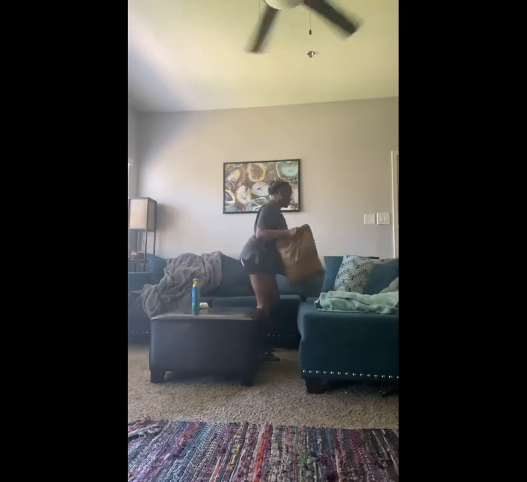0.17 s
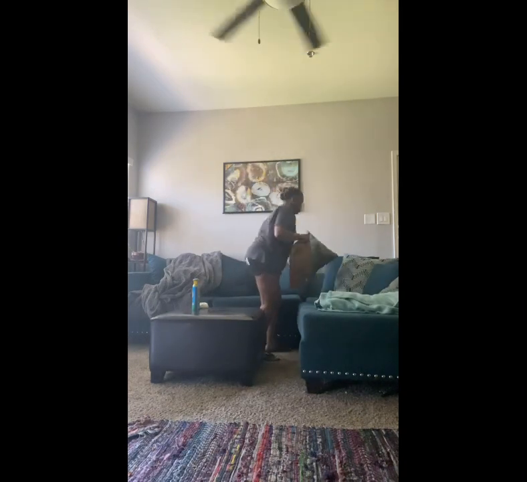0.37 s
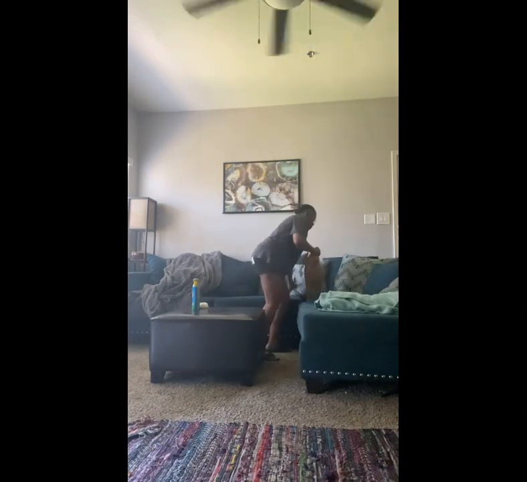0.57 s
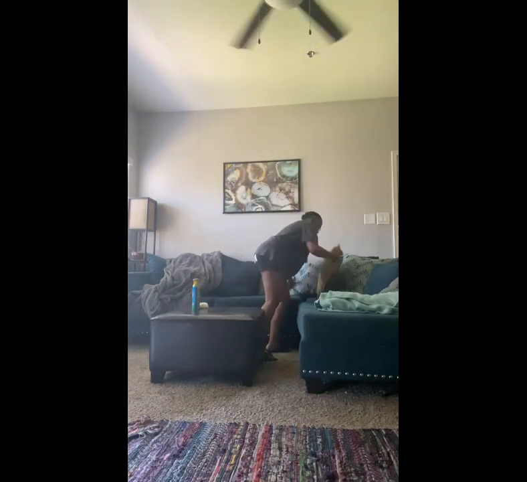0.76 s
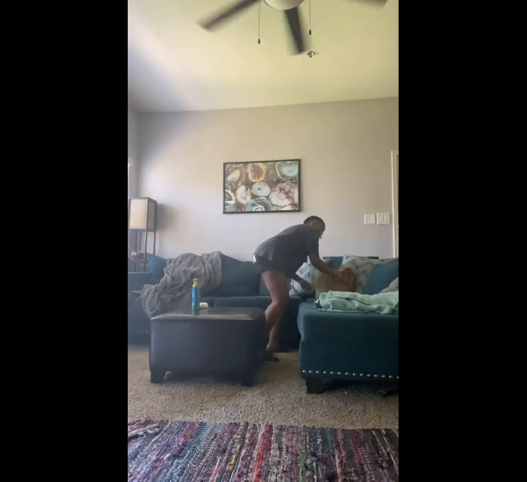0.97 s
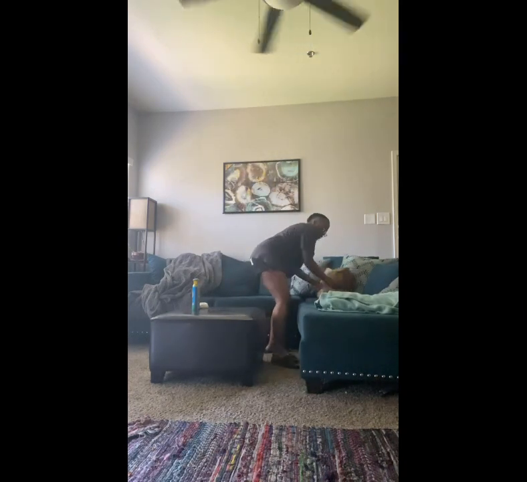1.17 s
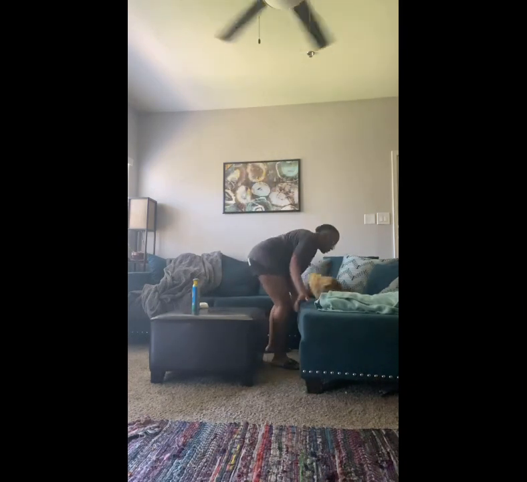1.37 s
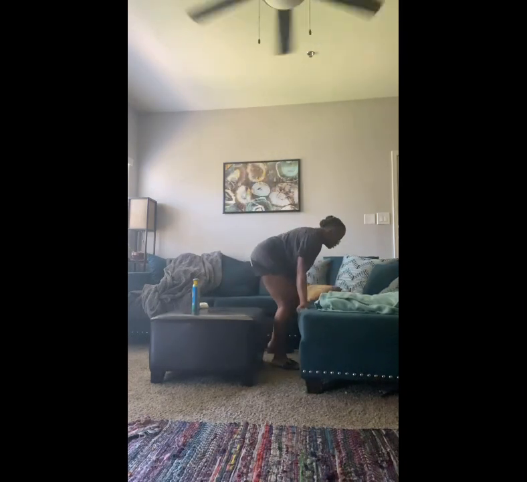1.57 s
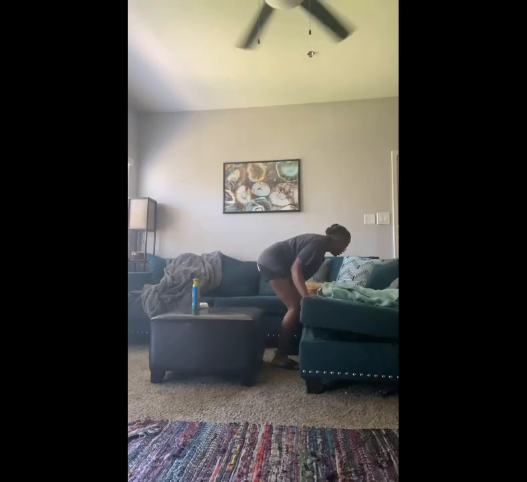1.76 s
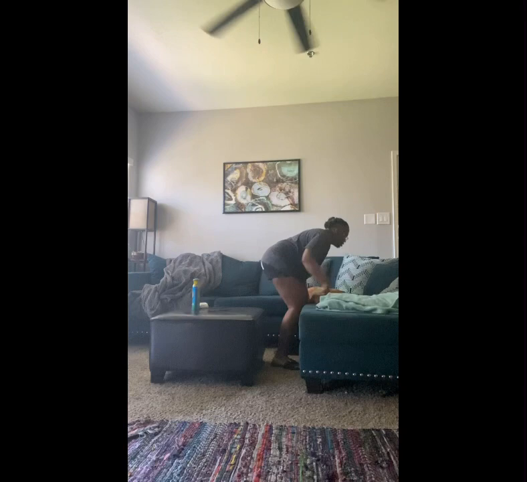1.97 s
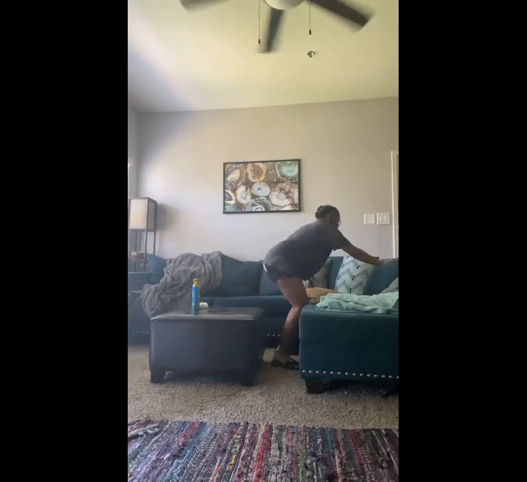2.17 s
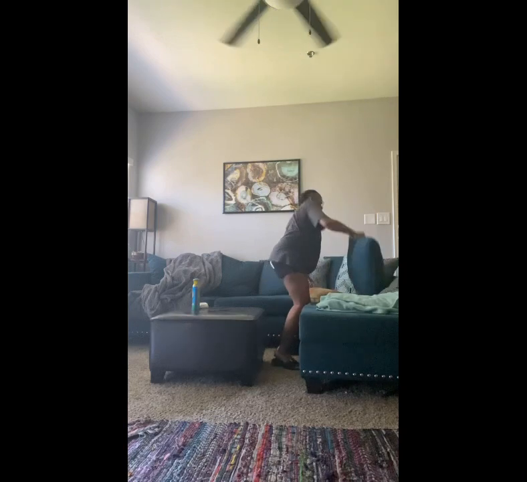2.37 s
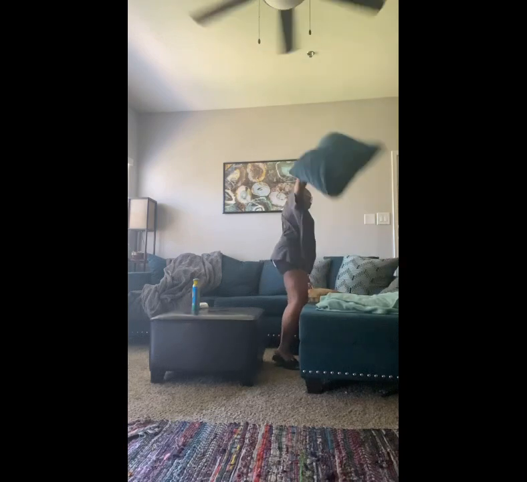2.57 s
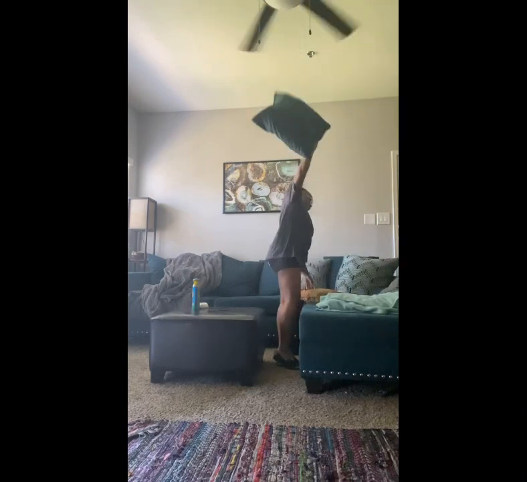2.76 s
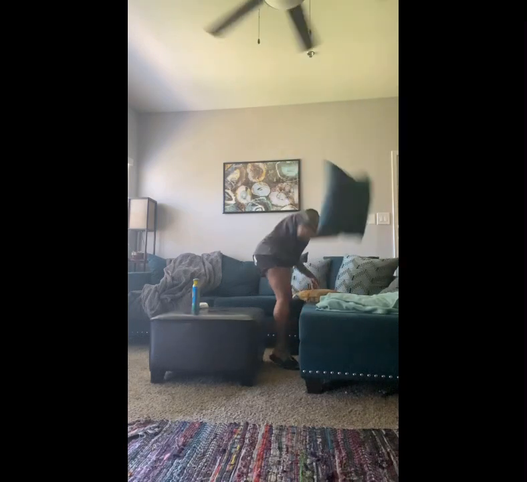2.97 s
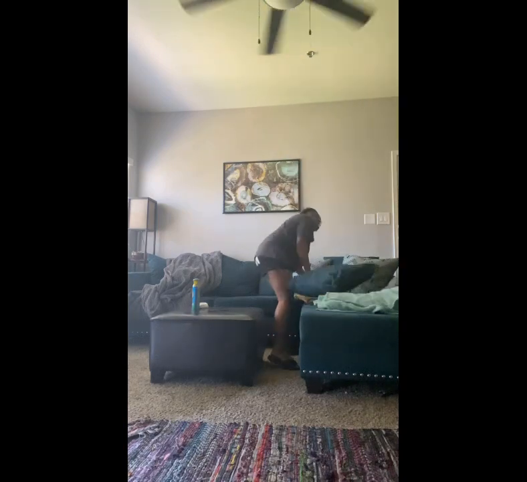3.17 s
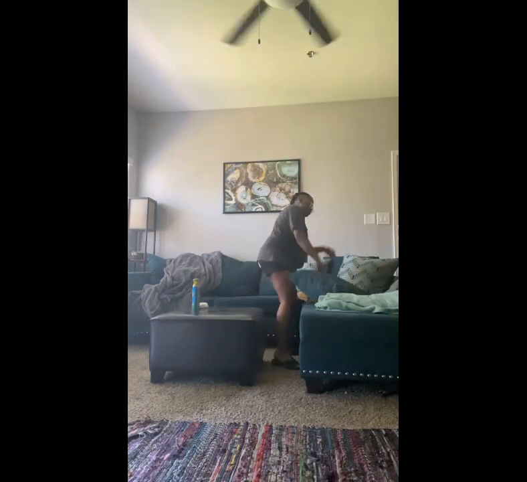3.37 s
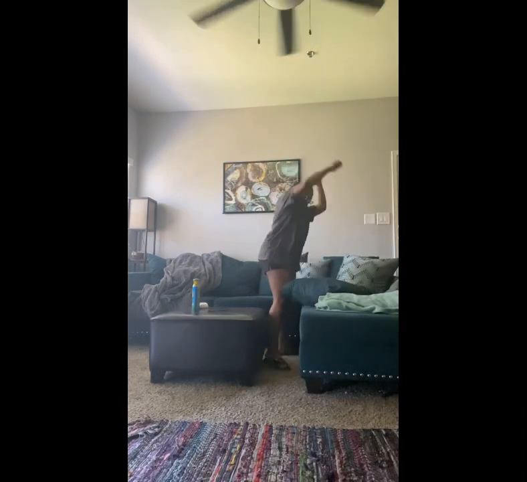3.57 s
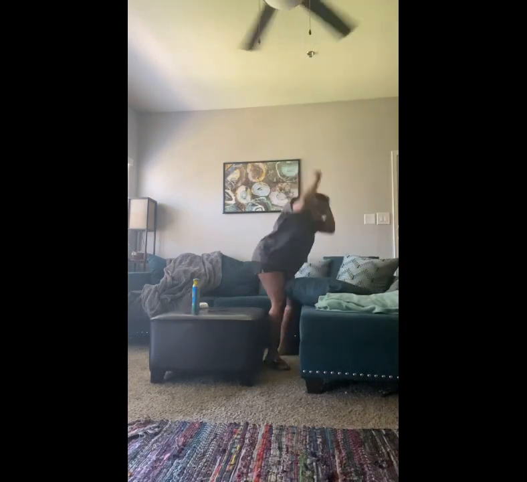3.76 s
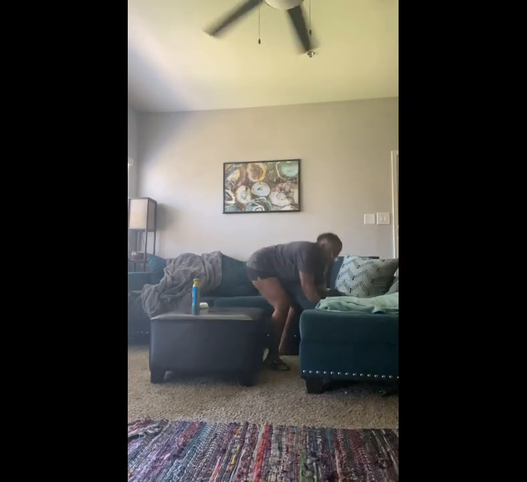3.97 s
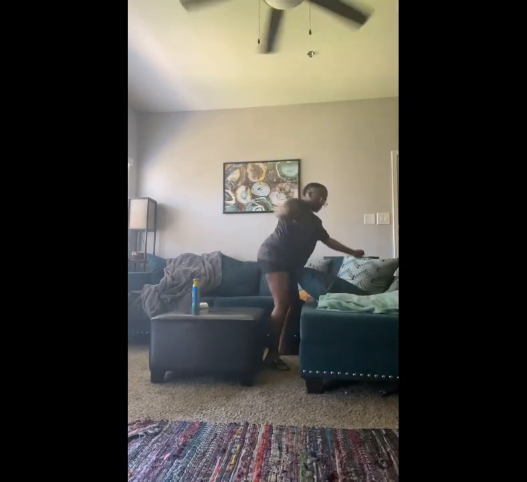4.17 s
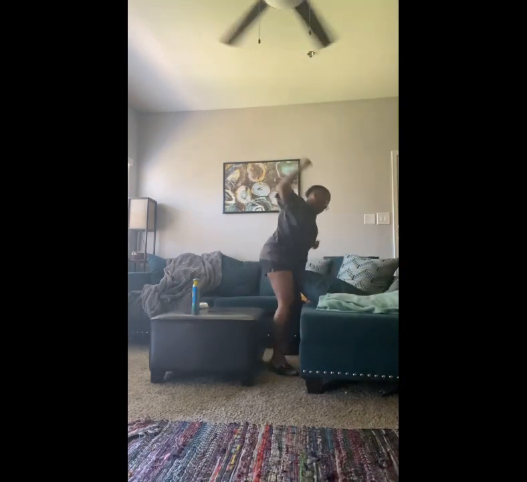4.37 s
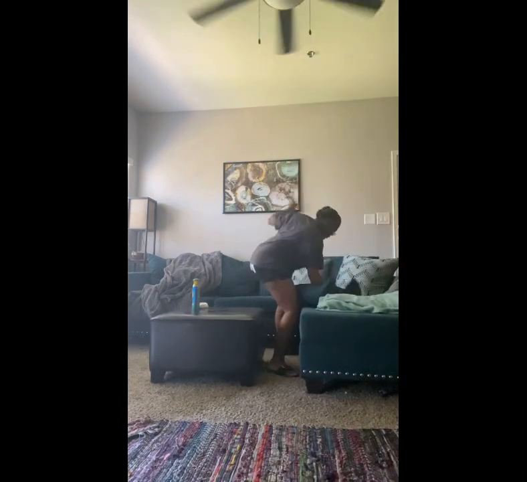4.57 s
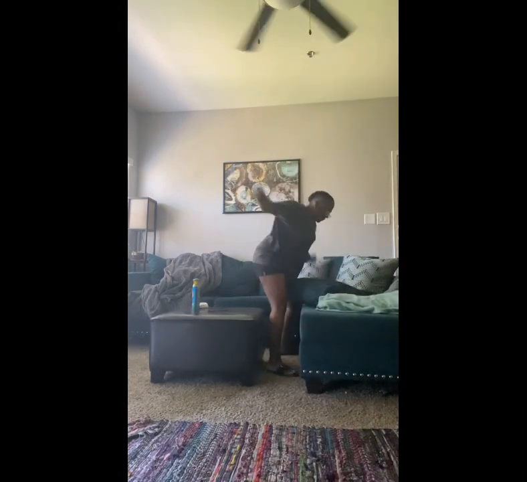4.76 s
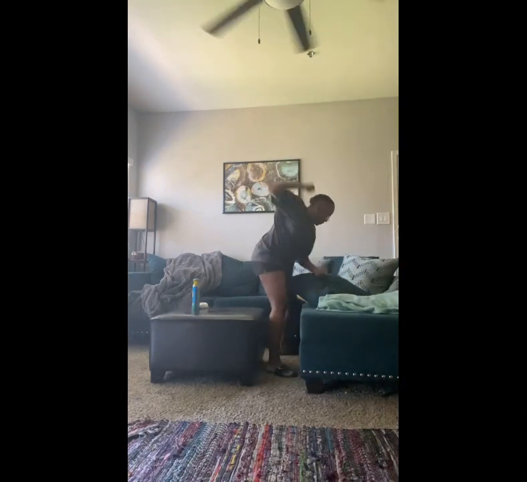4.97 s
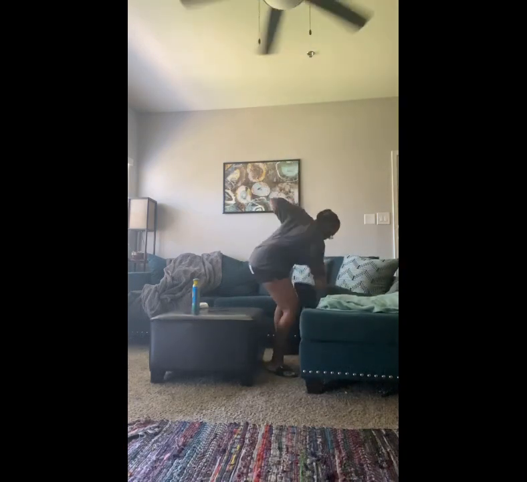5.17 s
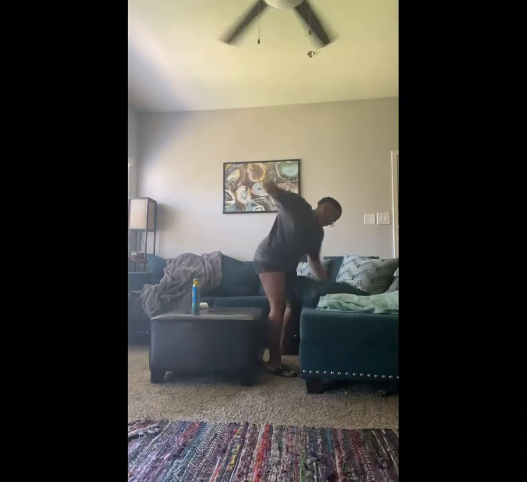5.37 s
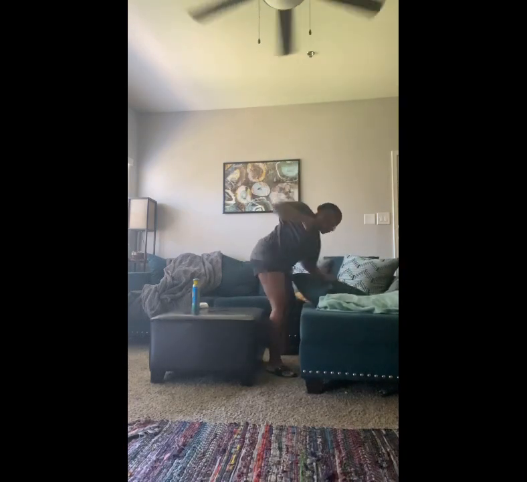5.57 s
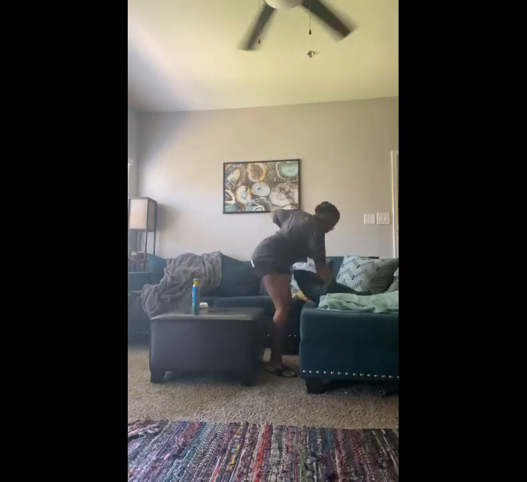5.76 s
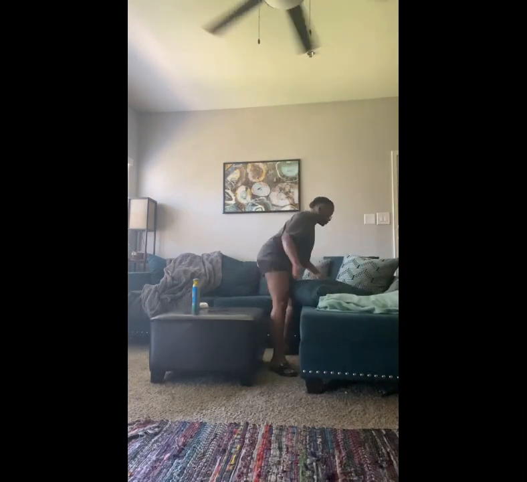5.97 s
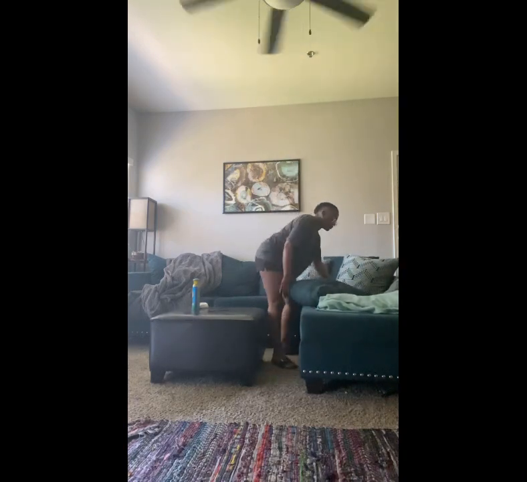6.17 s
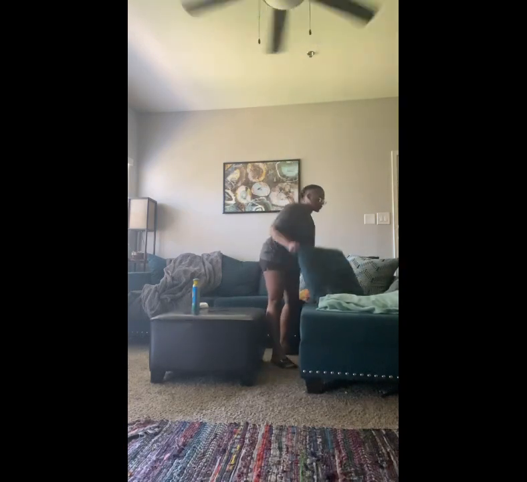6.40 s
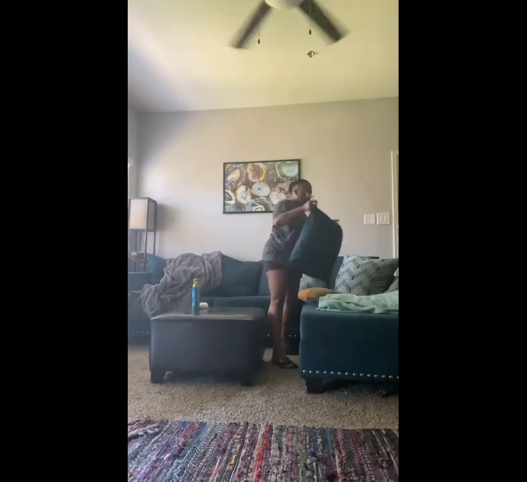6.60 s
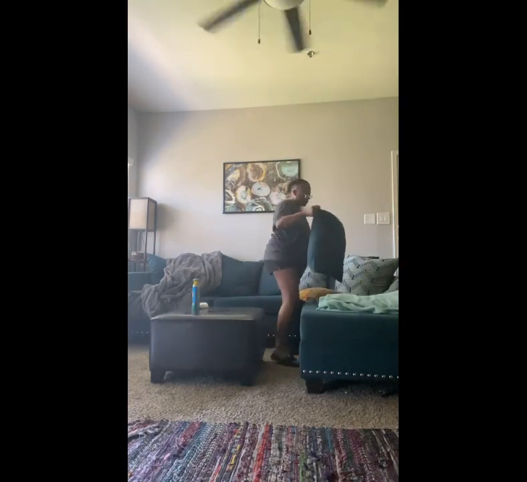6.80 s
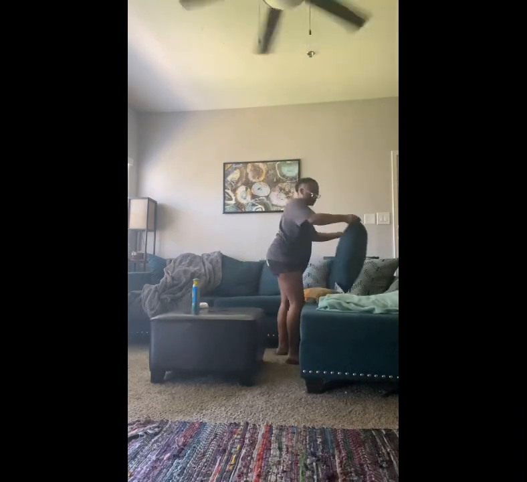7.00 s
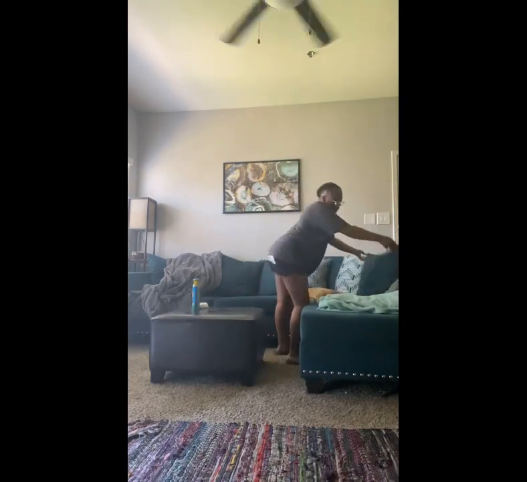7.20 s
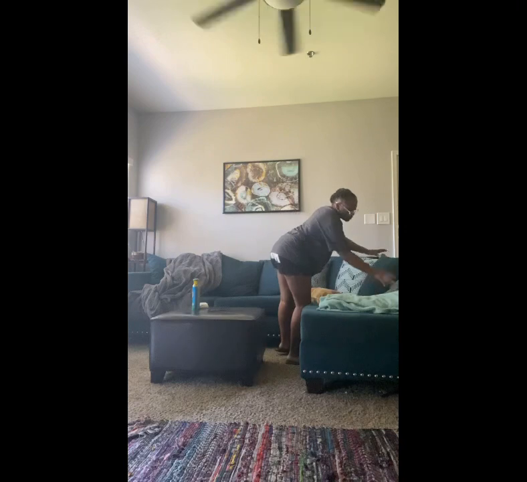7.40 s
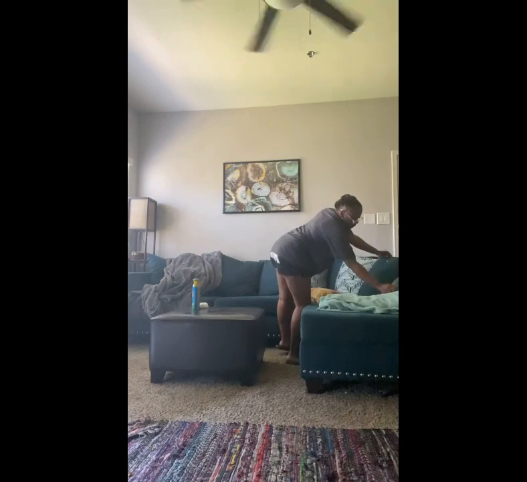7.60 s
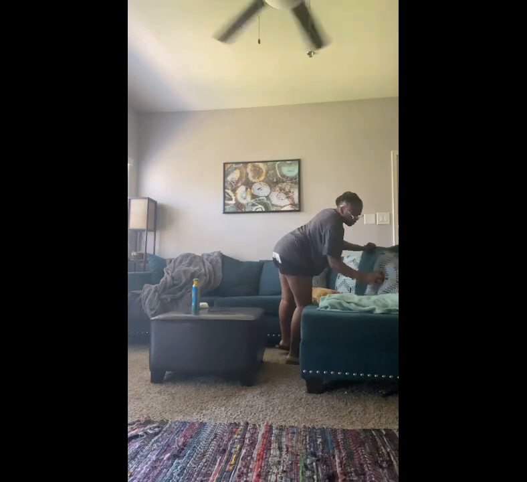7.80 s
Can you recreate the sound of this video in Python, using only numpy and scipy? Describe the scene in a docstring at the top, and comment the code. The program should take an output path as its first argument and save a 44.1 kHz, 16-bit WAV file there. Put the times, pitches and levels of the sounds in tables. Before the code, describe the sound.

Quiet cloth rustling and a jingling bracelet lead to three loud cushion blows, then lighter pats and fabric shuffling under a low fan hum.

```python
"""Cushions of a sofa are slammed, punched and patted in a carpeted room, after a footstool is set down.
A blow mixes noise bursts (slap), sinking sines (squeezed air, stuffing) and ringing modes (sofa, hollows).
Between blows fabric rustles and zips (shaped noise), cloth snaps, feet and cushions bump (noise bursts),
and a bracelet clicks and jingles (clicks through resonators, one bright noise burst).
A ceiling fan hums throughout (noise and sines)."""
import sys
import numpy as np
from scipy import signal
from scipy.fft import rfft, irfft
from scipy.io import wavfile

SR = 44100
rng = np.random.default_rng(int(sys.argv[2]) if len(sys.argv) > 2 else 0)


def unload_wav(signal):
    """Save mono or channel-first audio to the path in sys.argv[1] as 16-bit WAV at rate SR, clipped to [-1, 1]."""
    wavfile.write(
        sys.argv[1],
        SR,
        np.round(np.clip(np.atleast_2d(signal).T, -1, 1) * 32767).astype(np.int16),
    )


N = 345744
TIME_S = np.arange(N) / SR
AGE_S = np.arange(int(.6 * SR)) / SR   # since a contact began
SIDES = np.array([[1], [-1]])   # left, right


def from_db(db):
    """Decibels to gain."""
    return 10 ** (np.asarray(db) / 20)


def rms_one(x):
    """Scale to rms 1."""
    return x / np.sqrt(np.mean(x ** 2) + 1e-20)


def at_hz(points, hz):
    """Read a table on a log-frequency axis."""
    table = np.array(points)
    return np.interp(np.log(hz), np.log(table[:, 0]), table[:, 1])


def drift(rate_hz):
    """Random wander: straight lines between unit-normal knots, rate_hz knots a second."""
    knots = rng.standard_normal(4000)
    return np.interp(TIME_S * rate_hz, np.arange(len(knots)), knots)


def add(out, start_s, sound):
    """Mix a sound into out from start_s on."""
    i = max(round(start_s * SR), 0)
    out[:, i:i + sound.shape[-1]] += sound[..., :N - i]


def bandpass(x, band_hz):
    """Second-order Butterworth bandpass."""
    return signal.sosfilt(signal.butter(2, band_hz, "band", fs=SR, output="sos"), x)


def lowpass(x, cutoff_hz):
    """Second-order Butterworth lowpass."""
    return signal.sosfilt(signal.butter(2, cutoff_hz, fs=SR, output="sos"), x)


def resonate(x, hz, width_hz):
    """One resonance, gain 1 at its top."""
    return signal.lfilter(*signal.iirpeak(hz, hz / width_hz, fs=SR), x + 1e-18)


# microphone pair, left-right likeness: pitch_hz, correlation
LIKENESS = [(100, .9995), (300, .99), (740, .94), (1220, .65), (2000, .3), (3300, .6), (5500, .4),
            (9000, .8), (14000, .85)]
# microphone pair, left minus right: pitch_hz, level_db
BALANCE_DB = [(60, 0), (160, -.5), (700, -.5), (1250, -1.5), (2000, 1.5), (3300, 3), (5500, .5), (15000, 0)]


def spread(mid, side, hz):
    """Two unrelated signals become a stereo pair with the likeness and balance of that frequency."""
    alike = np.clip(at_hz(LIKENESS, hz), -.8, 1)
    pair = mid + SIDES * side * np.sqrt((1 - alike) / (1 + alike))
    return pair * from_db(SIDES * at_hz(BALANCE_DB, hz) / 2)


def steady_noise(spectrum):
    """Stereo noise shaped by a spectrum in dB per Hz; rms 1."""
    hz = np.maximum(np.arange(N // 2 + 1) * SR / N, 1)
    mid, side = rfft(rng.standard_normal((2, N))) * from_db(at_hz(spectrum, hz))
    return rms_one(irfft(spread(mid, side, hz), N))


def gliding_noise(pitch_hz, width_hz, spread_hz):
    """Narrow stereo noise: slow noise turned round at a moving pitch; rms 1."""
    turn = 2 * np.pi * np.cumsum(pitch_hz) / SR
    uneven = lowpass(rng.standard_normal((2, 2, len(pitch_hz))), width_hz)
    mid, side = uneven[0] * np.cos(turn) + uneven[1] * np.sin(turn)
    return rms_one(spread(mid, side, spread_hz))


# room decay: pitch_hz, t60_s
ROOM_T60 = [(60, .42), (150, .36), (400, .28), (1000, .29), (3000, .31), (7000, .31), (15000, .28)]
# room tail relative to the contact: pitch_hz, level_db
ROOM_SHARE = [(60, 2), (200, -5), (500, -4), (900, 3.5), (3000, -7.5), (15000, -0.5)]
# half-octave bands
EDGES_HZ = 34 * 2 ** (np.arange(19) / 2)
CENTRES_HZ = np.sqrt(EDGES_HZ[1:] * EDGES_HZ[:-1])


def burst(band_db, contact_s, rise_cycles, hold_cycles=4.4):
    """A short contact and its room tail, band by band; low bands build up and let go more slowly."""
    out = 0
    white = rng.standard_normal((len(CENTRES_HZ), 2, len(AGE_S)))
    for low_hz, high_hz, hz, db, noise in zip(EDGES_HZ, EDGES_HZ[1:], CENTRES_HZ, band_db, white):
        contact = np.exp(-(AGE_S / (contact_s + hold_cycles / hz)) ** 2)
        tail = from_db(at_hz(ROOM_SHARE, hz) - 60 * AGE_S / at_hz(ROOM_T60, hz))
        swell = 1 - np.exp(-AGE_S * hz / rise_cycles)
        settled = bandpass(noise, [low_hz, high_hz])[:, ::-1]   # reversed to start at full strength
        mid, side = settled * np.hypot(contact, tail) * swell
        out = out + from_db(db) * spread(rms_one(mid), rms_one(side), hz)
    return out


def crack(band_hz, decay_s):
    """A sudden crack, as of cloth pulled taut: a very short, dry flick of noise."""
    noise = bandpass(rng.standard_normal(len(AGE_S)), np.clip(band_hz, 50, SR / 2 - 50))
    return rms_one(lowpass(noise, 6000)) * np.exp(-AGE_S / decay_s)


def swing(hz, peak_s, sag_octaves):
    """A few swings, as of squeezed air, strongest at peak_s and sinking in pitch."""
    age = AGE_S / peak_s
    pitch_hz = hz * 2 ** (-sag_octaves * np.tanh(age - 1))
    return (age * np.exp(1 - age)) ** 2 * np.sin(2 * np.pi * np.cumsum(pitch_hz) / SR)


def ring(modes, detune, uneven_db, rise_s):
    """Decaying sines that build up; each strike varies the strength, pitch and phase of every mode."""
    sines = 0
    for hz, db, t60_s in modes:
        strength, shift, phase = rng.standard_normal(3)
        level = from_db(db + uneven_db * strength - 60 * AGE_S / t60_s)
        sines = sines + level * np.sin(2 * np.pi * (hz * (1 + detune * shift) * AGE_S + phase))
    return sines * (1 - np.exp(-AGE_S / rise_s)) ** 2


# fan air noise, relative spectrum: pitch_hz, level_db_per_hz
FAN_AIR = [(25, -41.5), (55, -0.5), (90, 6.5), (140, -4), (290, -8.5), (400, -8.5), (700, -14.5),
           (1400, -33.5), (3000, -33), (6000, -42), (9000, -54), (15000, -51)]
# motor hum, before hum_db: pitch_hz, level_db
HUM = [(53, -72), (104.8, -57), (179.7, -63.5), (289, -72.5), (447, -79.5)]
FAN_DB, BLADES_PER_S = -57, 11.5


def fan(hum_db=-.5, waver_db=1.66, wander_rad=0.35, flutter_db=1.0):
    """Stirred air as steady noise, and a motor hum of sines that flutters as the blades pass."""
    flutter = flutter_db * np.sin(2 * np.pi * BLADES_PER_S * TIME_S + drift(2.2))
    hum = 0
    for hz, db in HUM:
        level = from_db(db + hum_db + flutter + waver_db * drift(6.3))
        phase = 2 * np.pi * hz * TIME_S + wander_rad * drift(7.5)
        hum = hum + level * np.sqrt(2) * np.sin(phase)
    return hum + from_db(FAN_DB) * steady_noise(FAN_AIR)


# strokes of cloth over cloth, levels before the fabric gains:
# fastest_s, half_length_s, hiss_db, weave_hz, drag_db
STROKES = [(0.0, 0.046, -60.5, 3190, -56.5), (0.288, 0.014, -57, 2950, -64), (0.43, 0.033, -61, 3047, -70),
           (0.526, .035, -62, 3265, -71), (0.789, 0.055, -69.5, 2920, -65),
           (0.929, 0.044, -61.5, 3084, -79.5), (1.052, 0.0303, -69, 2989, -64),
           (1.537, 0.13, -57.5, 2995, -65.5), (1.76, 0.032, -58, 3136, -60),
           (1.928, 0.04, -60, 3230, -69.5), (2.265, .11, -62, 3173, -65), (2.517, 0.09, -64, 3183, -80),
           (2.787, 0.082, -60.5, 3318, -66.5), (2.98, 0.047, -59.5, 3119, -65.5),
           (3.217, .04, -56.5, 3381, -61.5), (3.333, 0.057, -52, 3588, -60), (3.57, 0.043, -54, 3034, -77),
           (4.088, 0.09, -59.5, 3503, -66), (4.257, 0.018, -59.5, 3092, -63.5),
           (4.402, 0.043, -54.5, 3298, -68), (5.981, 0.056, -54, 3290, -62.5),
           (6.071, 0.0596, -57.5, 3150, -63), (6.215, 0.087, -62, 3302, -67.5),
           (6.416, 0.0289, -56, 3166, -64.5), (6.515, 0.053, -57.5, 3322, -60.5),
           (6.711, 0.03, -58.5, 3200, -77), (7.174, 0.056, -63, 3177, -66),
           (7.565, 0.087, -64.5, 3065, -62), (7.823, 0.039, -58, 3180, -64)]
STROKE_RISE, STROKE_FALL = 0.83, 0.95   # shares of half_length_s
SLOW_DROP_HZ = 170   # weave is lower by up to this at the slow ends of a stroke
IDLE_DB, IDLE_SWING_DB, IDLE_HZ = -73, 2.5, 3090   # light rubbing between strokes
# hiss after each row of BLOWS (a cushion cover creases back as it refills): start, fall
REFILL_DB, REFILL_DB_PER_S = -58, 44.5


def rubbing():
    """Hiss dB, weave Hz and drag dB of sliding cloth: idle rubbing, strokes, a fading hiss after blows."""
    power = from_db(IDLE_DB + IDLE_SWING_DB * drift(7.2)) ** 2
    for start_s, *_ in BLOWS:
        since_s = TIME_S - start_s
        power = power + (since_s > 0) * from_db(REFILL_DB - REFILL_DB_PER_S * np.abs(since_s)) ** 2
    bend, drag = 0, 1e-18
    for fastest_s, half_s, hiss_db, weave_hz, drag_db in STROKES:
        width_s = half_s * np.where(TIME_S < fastest_s, STROKE_RISE, STROKE_FALL)
        speed = np.exp(-((TIME_S - fastest_s) / width_s) ** 2)
        stroke = speed * from_db(hiss_db) ** 2
        power = power + stroke
        bend = bend + stroke * (weave_hz - IDLE_HZ - SLOW_DROP_HZ * (1 - speed))
        drag = drag + speed * from_db(drag_db) ** 2
    return 10 * np.log10(power), IDLE_HZ + bend / power, 10 * np.log10(drag)


# sliding cloth, relative spectrum: pitch_hz, level_db_per_hz
HISS = [(45, -10), (200, -5.5), (500, -2), (800, -10), (1400, -10), (2200, -19), (3200, -5.5), (4200, -9.5),
        (6000, -7), (7500, -21), (15000, -30)]
# cloth under pressure, relative spectrum: pitch_hz, level_db_per_hz
DRAG = [(45, -25.5), (250, -6), (500, 4), (850, 0), (1400, -9), (2300, -16.5), (4000, -18.5), (7000, -34.5),
        (15000, -49.5)]


def fabric(hiss_gain_db=-7.5, weave_db=-15.0, weave_width_hz=160, grain_db=1.0, clump_db=1.5,
           drag_gain_db=1):
    """Cloth slides in tiny jerks; threads zip at a pitch that follows speed, pressed cloth rustles lower."""
    hiss_db, weave_hz, drag_db = rubbing()
    catching_db = grain_db * drift(300) + clump_db * drift(29)
    weave_hz = weave_hz + 70 * drift(16)
    weave = gliding_noise(weave_hz, weave_width_hz, weave_hz.mean())
    cloth = from_db(hiss_gain_db) * steady_noise(HISS) + from_db(weave_db) * weave
    sliding = from_db(hiss_db + catching_db) * cloth
    return sliding + from_db(drag_db + drag_gain_db + catching_db) * steady_noise(DRAG)


# runs over the ribs of the cover: start_s, length_s, level_db, start_hz, end_hz
ZIPS = [(0.283, 0.039, -61, 2950, 2830), (1.905, 0.1, -69, 3170, 3320), (3.19, .09, -67.5, 3220, 3280),
        (3.275, 0.081, -61.5, 3410, 3370), (3.325, 0.0534, -67, 3580, 3670),
        (4.0, 0.084, -66.5, 3560, 3360), (4.074, .11, -66.5, 3480, 3214), (4.335, 0.101, -66, 3170, 3360)]


def zips(width_hz=85):
    """A hand or a fold runs over the ribs of the cover: a thin whistle that glides with its speed."""
    out = np.zeros((2, N))
    for start_s, length_s, db, start_hz, end_hz in ZIPS:
        along = np.minimum(AGE_S / length_s, 1)
        whistle = gliding_noise(start_hz + (end_hz - start_hz) * along, width_hz, start_hz)
        add(out, start_s, from_db(db) * np.sqrt(np.abs(np.sin(np.pi * along))) * whistle)
    return out


# bracelet shakes, levels before the gains: knock_s, knock_db, rattle_db, rattle_t60_s, swell_s
JINGLES = [(1.989, -34, -47, .2, .008), (2.2512, -43, -51, 0.49, .008), (2.5558, -67, -60, 0.19, .01),
           (2.732, -41, -43, 0.42, 0.03), (2.768, -33, -35, 0.3, 0.006), (2.907, -28.5, -35.5, 0.16, 0.016),
           (3.026, -26, -42, 0.3, .004), (3.4, -39, -48, 0.38, .015), (3.746, -53, -44, .35, .025),
           (3.856, -58, -50, 0.56, 0.0053), (4.1977, -54, -62.5, 0.12, .01)]
# bracelet modes, relative levels: pitch_hz, level_db, width_hz
BRACELET = [(4985, -18, 35), (5055, -14, 25), (5680, -17, 45), (5745, -17, 45), (6056, -21, 70),
            (6280, -27, 70), (11030, -31, 120), (12720, -26, 180), (15130, -18, 120), (15390, -11, 45),
            (15475, -5, 25), (15540, -6, 25), (15660, -15, 45)]
# broad ticks of the links, relative levels: low_hz, high_hz, level_db
LINK_TICKS = [(4500, 7800, -21), (10000, 14500, -16.5)]


def bracelet(knock_db=15, rattle_gain_db=-11, shifts_per_s=330, rebound_s=0.013, rebound_db=-4,
             uneven_db=3, tail_db=1, tail_t60_s=.22):
    """Links shift, knock, rebound and settle; each touch rings the modes anew, and the room blurs them."""
    shifting, knocks = 0, np.zeros((1, N))
    for start_s, db, rattle_db, settle_s, swell_s in JINGLES:
        since_s = TIME_S - start_s
        fade = np.maximum(-since_s / swell_s, since_s * np.log(1000) / settle_s)
        shifting = shifting + from_db(rattle_db) * np.exp(-np.minimum(fade, 20))
        for k, chance in enumerate(rng.random(size=3)):
            knock = from_db([db + knock_db + k * rebound_db])
            add(knocks, start_s + k * rebound_s * (.5 + chance), knock)
    touches = (rng.random(N) < shifts_per_s / SR) * np.sqrt(SR / shifts_per_s)
    clicks = knocks[0] + from_db(rattle_gain_db) * shifting * touches
    metal = 0
    for hz, db, width_hz in BRACELET:
        level = from_db(db + uneven_db * rng.standard_normal(size=997))
        strengths = np.resize(rng.choice([-1, 1], size=997) * level, N)
        metal = metal + resonate(clicks * strengths, hz, width_hz) * np.sqrt(SR / np.pi / width_hz)
    for low_hz, high_hz, db in LINK_TICKS:
        tick = bandpass(clicks + 1e-18, [low_hz, high_hz])
        metal = metal + from_db(db) * tick * np.sqrt(SR / 2 / (high_hz - low_hz))
    tail = rng.standard_normal(len(AGE_S)) * from_db(-60 * AGE_S / tail_t60_s)
    wet = signal.fftconvolve(metal, tail / np.linalg.norm(tail))[:N]
    return (metal + from_db(tail_db) * wet) / np.hypot(1, from_db(tail_db))


# snaps of cloth and hand, and one bright click of the bracelet (2.769 s), relative levels:
# start_s, level_db, contact_s, centre_hz, treble_db
SNAPS = [(0.276, -55, 0.019, 2630, -9), (1.772, -49.5, 0.0079, 2300, -5.5), (2.120, -62, 0.012, 3250, -3),
         (2.769, -56.5, 0.003, 6140, 9), (3.996, -50, 0.022, 1183, -3), (5.1297, -32, 0.038, 3550, 0),
         (5.493, -54, 0.0043, 1670, -10), (6.573, -52.5, 0.0046, 1900, 5.5)]
# colour of the snaps and the click, per half octave: pitch_hz, level_db
SNAP_COLOUR = [(45, -37), (300, -31.5), (900, -10.5), (2000, -5.5), (3200, -14.5), (4500, -0.5),
               (6300, -19.5), (8500, -20.5), (15000, -13)]


def snaps_and_click(level_db=-25, focus_db=9, focus_octaves=0.68, crack_db=9.0, crack_s=0.0011,
                    flap_db=-4, flap_loss_db=1.5, treble_hz=4300):
    """Thin, bright weightless contacts of cloth, hand or bracelet: a pitched crack, then ragged flicks."""
    out = np.zeros((2, N))
    for start_s, db, contact_s, hz, treble_db in SNAPS:
        focus = focus_db * np.exp(-(np.log2(CENTRES_HZ / hz) / focus_octaves) ** 2)
        treble = treble_db * (CENTRES_HZ > treble_hz)
        band_db = level_db + db + at_hz(SNAP_COLOUR, CENTRES_HZ) + focus + treble
        add(out, start_s, burst(band_db, contact_s, rise_cycles=1.9))
        add(out, start_s, from_db(db + crack_db) * crack([hz / 3, hz * 0.79], crack_s))
        for k, chance in enumerate(rng.random(size=6)):
            flap = crack([hz * 1.14, hz * 1.3], 2 * crack_s)
            flap_s = start_s + (k + 1 + chance) * contact_s / 3
            add(out, flap_s, from_db(db + flap_db - k * flap_loss_db) * flap)
    return out


# bumps of feet and cushions, relative levels:
# start_s, level_db, brightness_db_per_octave, knock_hz, knock_db
BUMPS = [(0.01, -63, 29.5, 767, -50), (0.28, -55, 13.5, 690, -59), (0.478, -50.5, -1, 610, -52.5),
         (0.513, -43.5, 1, 188, -44), (1.468, -50.5, 8, 495, -62), (1.518, -47.5, 6.5, 470, -43.5),
         (2.121, -48, 2, 343, -58), (2.308, -51, 5.5, 350, -53), (3.248, -45, -4.5, 202, -40),
         (4.253, -56, -9, 205, -40), (5.969, -59.5, 23, 864, -45.5), (6.557, -39.5, 14, 790, -48),
         (6.645, -41.5, 0, 630, -44), (6.7, -38.5, 3, 792, -44), (7.219, -44, -4, 260, -39),
         (7.545, -52, 13.5, 700, -48)]
# colour of the bumps, per half octave: pitch_hz, level_db
BUMP_COLOUR = [(45, -16.5), (90, -2.5), (200, 1), (400, 0.5), (800, -13), (1500, -23.5), (3000, -37),
               (6000, -52), (15000, -51)]


def bumps(level_db=-22, pivot_hz=350, knock_s=0.00505):
    """Soft, dull contacts, each with a short hollow knock; brightness tilts the octaves near the pivot."""
    out = np.zeros((2, N))
    octaves = np.clip(np.log2(CENTRES_HZ / pivot_hz), -2, 1)
    for start_s, db, brightness, knock_hz, knock_db in BUMPS:
        band_db = level_db + db + at_hz(BUMP_COLOUR, CENTRES_HZ) + brightness * octaves
        add(out, start_s - .003, burst(band_db, contact_s=0.039, rise_cycles=0.38))
        add(out, start_s, from_db(knock_db) * swing(knock_hz, knock_s, sag_octaves=0.16))
    return out


# blows on the cushions; the first row is a dull thump of a footstool set down on carpet.
# relative levels: start_s, slap_db, thud_db, stuffing_db, puff_db, contact_s,
# thud_hz, sink_s, shove_db, shove_hz, shove_peak_s, pocket_hz, pocket_db, smack_db, smack_delay_s
BLOWS = [(1.802, -59, -29, -33.5, -42, 0.021, 110, 0.0052, -15.5, 208, 0.0021, 371, -26, -63, 0.0015),
         (3.007, -13.5, -9, -17.5, -14.5, 0.037, 78, 0.0092, -12.5, 226, 0.0078, 877, -15, -20, .004),
         (3.8497, -15, -18.5, -21.5, -19, 0.023, 210, 0.0064, -15.5, 216.8, .017, 1051, -22.5, -21.5, .002),
         (4.4725, -17.5, -14.5, -25.5, -19, 0.03, 107, 0.008, -18.5, 208, 0.013, 776, -19, -20.5, .0015),
         (4.767, -31.5, -24.5, -30, -37.5, 0.006, 103.5, 0.017, -35.5, 252, .014, 455, -39, -46, 0.0057),
         (5.062, -27, -27, -25, -28, 0.013, 110, 0.0066, -22.5, 229.6, 0.0099, 513, -32, -39.5, 0.0049),
         (5.3359, -28, -24.5, -36, -32, 0.0079, 98.6, 0.018, -32.5, 352, 0.014, 661, -31, -33, 0.0079),
         (5.63, -24, -23, -33.5, -25, 0.022, 105, 0.015, -33, 214, 0.024, 541, -26, -38.5, 0.0017),
         (6.564, -43.5, -29, -50, -35, 0.0062, 85.4, 0.015, -28.5, 248, 0.01, 813, -34, -54, 0.008)]
# centres of thud, stuffing, puff and slap: pitch_hz
PART_HZ = [85, 250, 680, 2000]
# colour common to all rows of BLOWS, per half octave: pitch_hz, level_db
BLOW_COLOUR = [(42, -36), (60, -15), (85, -11.5), (120, -5.5), (160, -18.5), (230, -1.5), (340, -1),
               (490, 1), (750, -7), (1050, -12), (1400, -15.5), (2000, -19.5), (3100, -20.5), (4500, -12),
               (7000, -37.5), (15000, -42)]
# sofa frame and low room modes, relative levels: pitch_hz, level_db, t60_s
SOFA = [(57, -12, .28), (79, 2, .24), (106, 2, .2), (204, -1, .2)]
# hollows between cushions and seat, relative levels: pitch_hz, level_db, t60_s
HOLLOWS = [(253, 0, .27), (283, -4, .24), (320, -4, .19), (368, -4, .2), (487, -1, .17), (528, -1, .15),
           (640, -2, .19), (675, -3, .19), (736, -3, .19), (824, -5, .15), (1040, -8, .17),
           (1319, -12, .18)]


def thump_and_blows(burst_db=-18, sofa_db=4, hollows_db=-7, brush_db=-22, brush_s=0.0058, crack_db=-11,
                    crack_s=0.00076, off_pitch_db=10, pocket_s=.008, smack_decay_s=0.0033):
    """Cover slaps, air pops, stuffing shoves, sofa and hollows ring; the footstool thump uses the same parts."""
    out = np.zeros((2, N))
    for (start_s, slap_db, thud_db, stuffing_db, puff_db, contact_s, thud_hz, sink_s, shove_db, shove_hz,
         shove_s, pocket_hz, pocket_db, smack_db, smack_s) in BLOWS:
        parts = list(zip(PART_HZ, [thud_db, stuffing_db, puff_db, slap_db]))
        band_db = burst_db + at_hz(BLOW_COLOUR, CENTRES_HZ) + at_hz(parts, CENTRES_HZ)
        # on a cushion, loose cloth brushes just before the weight lands, then cracks taut
        add(out, start_s - brush_s, burst(band_db + brush_db, contact_s, rise_cycles=7.6))
        add(out, start_s, burst(band_db, contact_s, rise_cycles=3.0))
        add(out, start_s, from_db(slap_db + crack_db) * crack([700, 4200], 2 * crack_s))
        # the full face lands flat
        smack_gain = from_db(smack_db + SIDES / 2 * at_hz(BALANCE_DB, PORT_HZ))
        add(out, start_s + smack_s, smack_gain * crack([2400, 3700], smack_decay_s))
        # trapped air pops, the stuffing follows lower down
        add(out, start_s, from_db(pocket_db) * swing(pocket_hz, pocket_s, sag_octaves=.12))
        add(out, start_s, from_db(shove_db) * swing(shove_hz, shove_s, sag_octaves=0.4))
        hollows = [(hz, db + at_hz(parts, hz), t60_s) for hz, db, t60_s in HOLLOWS]
        hollow_ring = ring(hollows, detune=.008, uneven_db=1.5, rise_s=.005)
        add(out, start_s, from_db(hollows_db) * hollow_ring)
        # the spot hit favours low modes within half an octave of its pitch
        modes = []
        for hz, db, t60_s in SOFA:
            off_pitch = min(2 * abs(np.log2(hz / thud_hz)), 1)
            modes.append((hz, db - off_pitch_db * off_pitch, t60_s))
        sofa_ring = ring(modes, detune=0.03, uneven_db=2.5, rise_s=sink_s)
        add(out, start_s, from_db(thud_db + sofa_db) * sofa_ring)
    return out


# room peaks and dips: pitch_hz, width_hz, level_db
ROOM_COLOUR = [(162, 14, -14), (196, 22, 3), (283, 18, 3), (368, 16, 1), (398, 12, -12), (422, 14, 1),
               (444, 24, -18), (487, 22, 4), (532, 30, 3), (572, 14, -6), (640, 20, 3), (733, 20, 3),
               (770, 26, -7), (822, 24, 2), (978, 18, -14), (1043, 30, 3), (1335, 60, 3), (1500, 32, -11)]


def room(x):
    """Reflections reinforce some pitches and cancel others: resonators in series."""
    for hz, width_hz, db in ROOM_COLOUR:
        x = x + (from_db(db) - 1) * resonate(x, hz, width_hz)
    return x


def scene():
    """Everything that sounds in the room."""
    quiet = fan() + fabric() + zips() + bracelet() + snaps_and_click()
    return quiet + room(bumps() + thump_and_blows())


# gain of the added port resonance: left_db, right_db
PORT_DB = (8, 8.5)
PORT_HZ, PORT_WIDTH_HZ, PORT_LAG_SAMPLES = 3150, 600, 3
CUTOFF_HZ = 16200


def record(dry):
    """Microphone ports ring near 3 kHz, the left lags; the highest peaks are rounded, the top is cut."""
    port = resonate(dry, PORT_HZ, PORT_WIDTH_HZ)
    left, right = dry + from_db(PORT_DB)[:, None] * port
    pair = np.array([np.pad(left, (PORT_LAG_SAMPLES, 0))[:N], right])
    pair = pair / (1 + (pair / .92) ** 8) ** (1 / 8)
    return signal.sosfilt(signal.ellip(10, .2, 80, CUTOFF_HZ, fs=SR, output="sos"), pair)


dry = scene()
out = record(dry)
unload_wav(out)
```